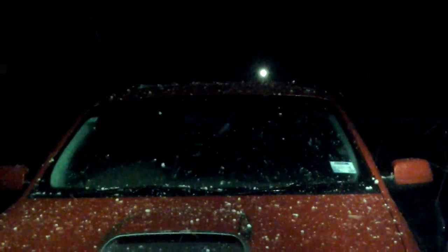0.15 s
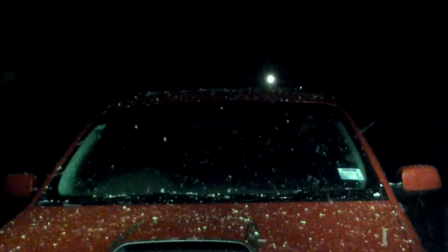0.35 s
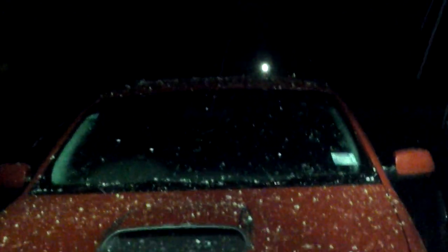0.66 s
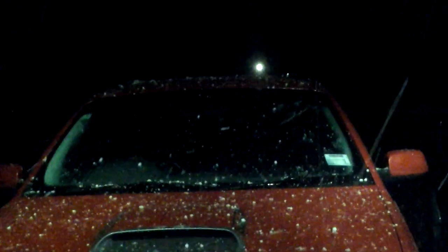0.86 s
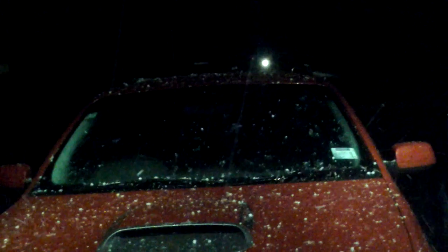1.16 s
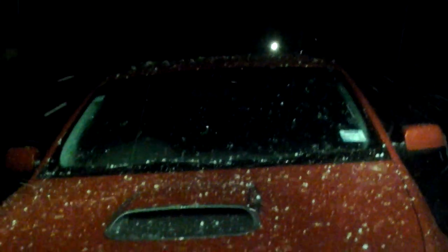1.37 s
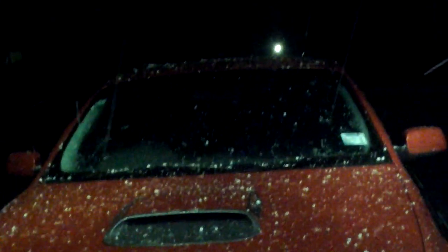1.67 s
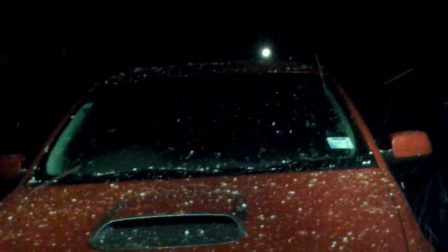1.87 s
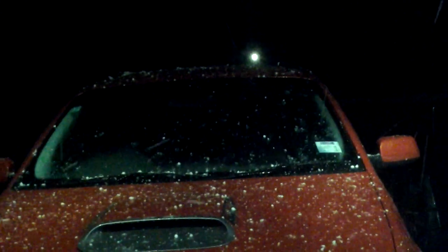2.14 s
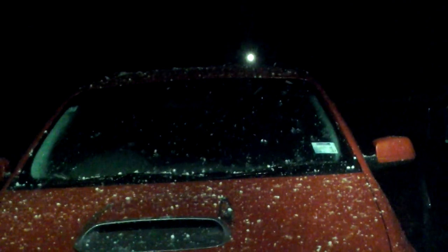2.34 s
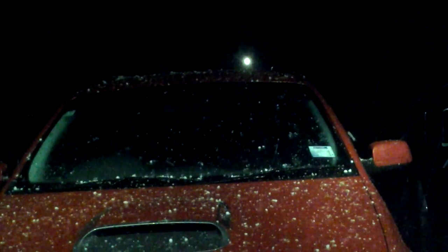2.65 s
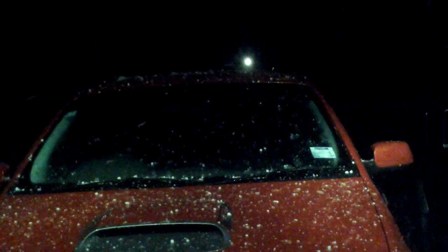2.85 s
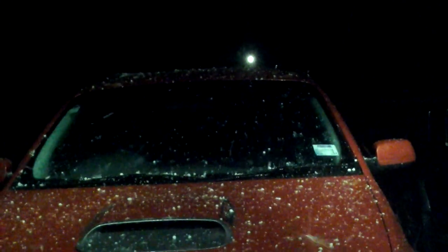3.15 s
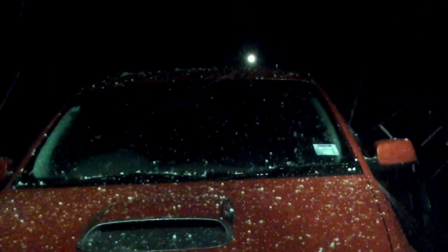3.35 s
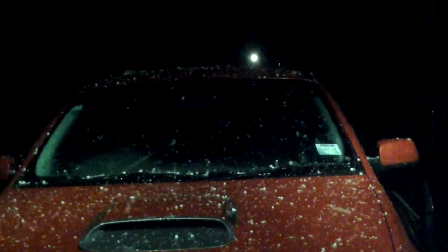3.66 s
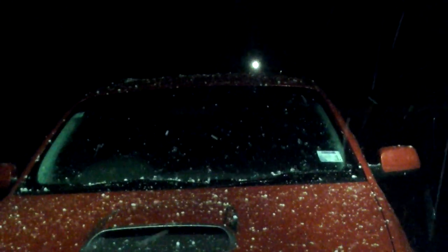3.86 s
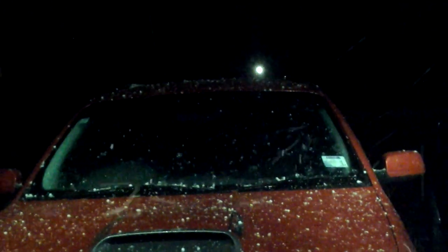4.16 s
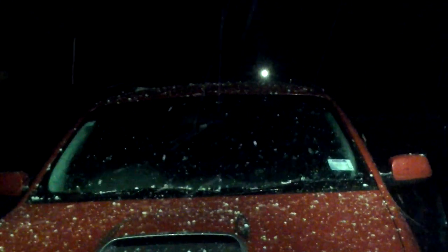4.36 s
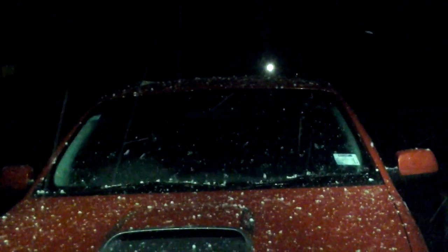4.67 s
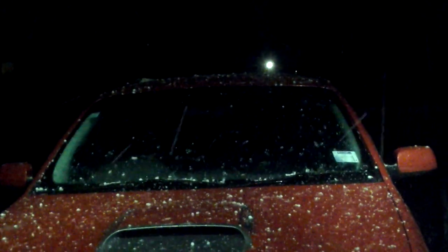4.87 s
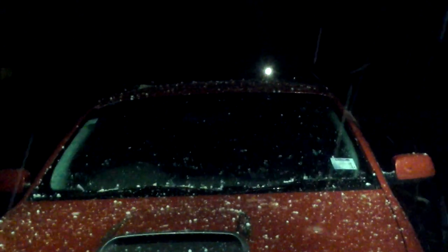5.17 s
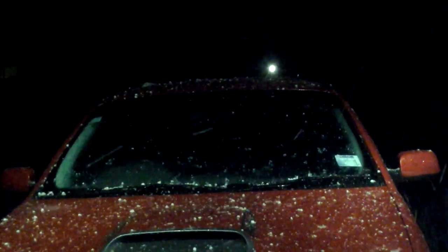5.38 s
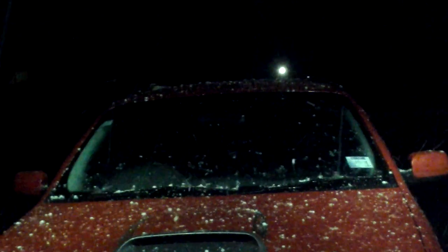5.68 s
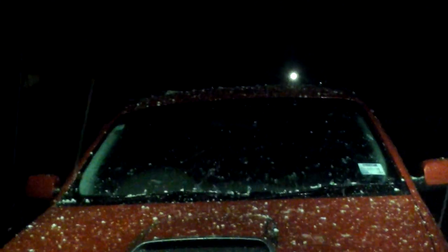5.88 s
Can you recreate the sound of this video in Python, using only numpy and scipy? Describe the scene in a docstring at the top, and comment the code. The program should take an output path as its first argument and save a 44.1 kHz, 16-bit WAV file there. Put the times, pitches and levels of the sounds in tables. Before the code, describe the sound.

Close and outdoors, heavy hail batters a parked car without pause. Thousands of small blows merge into a metallic drumming from roof and bonnet, while stones tick and rap on the windscreen. Heavier ones knock several times a second with short booms, big ones clack sharply, and ice chips skitter and hiss. The sound is loud, squashed and slightly overloaded.

```python
"""Heavy hail drums on the roof and bonnet of a parked car: thousands of blows a second ring dense panel modes.
Heavier stones knock and boom on the metal, and overload the recorder with a low thump; loud moments crackle.
Stones tick and rap on the windscreen, a stiffer plate; big ones clack with two brief modes and scatter pieces.
Breaking ice skitters and hisses.
A gain control steadies the loud clatter, its highest peaks flatten, and the top of the band is cut off."""
import sys
import numpy as np
from scipy import signal
from scipy.fft import rfft, irfft, next_fast_len
from scipy.io import wavfile
from scipy.ndimage import map_coordinates

SR = 44100
rng = np.random.default_rng(int(sys.argv[2]) if len(sys.argv) > 2 else 0)


def log_audio(samples):
    """Write samples as a 16-bit WAV file to the path given in sys.argv[1]."""
    # one column per channel
    frames = np.atleast_2d(samples).T
    # limit to full scale, then quantise
    limited = np.clip(frames, -1, 1)
    pcm = np.round(limited * 32767).astype(np.int16)
    wavfile.write(sys.argv[1], SR, pcm)


N = 265299

# Radiation spectrum of skittering ice chips: frequency_hz, relative_level_db (per Hz)
CHIP_SPECTRUM = [(2500, -40), (4500, 11), (5600, 6), (7000, 3), (8700, 3.5), (10000, -2), (11800, -3.5),
                 (12800, -40), (14500, -42)]
# Heavy stones on the sheet metal and the overload thump that comes with each, levels relative:
# start_s, roof_boom_db, bonnet_boom_db, knock_db, knock_hz, overload_thump_db
HEAVY_STONES = [(0.074, -28, -19, 7.5, 885, -55), (0.176, -24, -18, -3, 1080, -42),
                (0.499, -15, -27, -9, 587, -55), (0.545, -14, -18, 6, 544, -41),
                (0.754, -26, -13, 3, 920, -32), (0.812, -21, -18, 0, 960, -32),
                (1.046, -8, -7, 2, 990, -45), (1.062, -26, -16, 3, 1410, -33),
                (1.169, -10, -12, 4, 445, -39), (1.312, -10, -7.5, 5, 1010, -39),
                (1.422, -8, -8, 4, 1080, -30), (1.616, -23, -20, 2, 744, -38),
                (1.759, -20, -27, -3, 970, -33), (1.957, -18, -11, 0, 1280, -47),
                (2.05, -28, -12, 3, 1130, -55), (2.146, -7, -19, 7, 563, -32),
                (2.265, -8, -18, -3, 660, -42), (2.604, -22, -28, 1, 600, -36),
                (2.756, -11, -10, 6, 820, -34), (2.852, -16, -18, 1, 860, -35),
                (2.983, -24, -13, -9, 680, -55), (3.019, -7, -20, 9, 660, -30),
                (3.283, -16, -14, -1, 900, -44), (3.387, -26, -13, 4, 975, -43),
                (3.496, -24, -24, 6, 714, -37), (3.595, -28, -11, -6, 1190, -55),
                (3.633, -17, -26, 3, 564, -36), (3.754, -22, -20, 4.5, 840, -40),
                (3.851, -12, -17, 7, 750, -57), (4.022, -16, -27, -4, 1060, -36),
                (4.072, -23, -22, 1, 800, -35), (4.135, -26, -11, 0, 1220, -39),
                (4.201, -10, -8.5, 6, 726, -45), (4.241, -19, -11, 6, 710, -40),
                (4.372, -12, -23, 5, 650, -29), (4.456, -24, -6, -1, 1150, -55),
                (4.547, -24, -26, 2, 880, -40), (4.652, -11, -9, 7, 670, -34),
                (4.775, -8, -19, 5, 1000, -35), (4.876, -25, -17, -2, 1080, -40),
                (5.242, -13, -26, 3, 566, -40), (5.312, -18, -13, -2, 1030, -55),
                (5.393, -20, -14, 7, 517, -35), (5.513, -14, -11, 6, 580, -36),
                (5.672, -13, -19, 4, 744, -35), (5.728, -12, -15, 1, 900, -40),
                (5.827, -18, -15, -3, 624, -40), (5.965, -24, -7, 7, 1000, -38)]


def amp(db):
    """Level to amplitude: 20 dB is a factor of ten."""
    return 10 ** (np.asarray(db) / 20)


def unit(x):
    """Normalisation to an rms of 1."""
    return x / np.sqrt(np.mean(x ** 2) + 1e-20)


def along(points, hz):
    """Interpolation of a spectrum on a logarithmic frequency axis."""
    f, v = np.transpose(points)
    return np.interp(np.log(hz + 1), np.log(f), v)


def curves(rows):
    """Linear interpolation in time: one value per sample for each column after the time."""
    s, *columns = np.transpose(rows)
    return [np.interp(np.arange(N) / SR, s, column) for column in columns]


def wobble(rate):
    """Band-limited random fluctuation: a smooth curve through rate random knots a second."""
    knots = rng.standard_normal(int(N * rate / SR) + 4)
    return map_coordinates(knots, [np.arange(N) * rate / SR])


def swells(times, levels_db, rise, t60):
    """Exponential build-up and decay: envelopes with rise constant rise and 60 dB decay time t60 (s)."""
    t = np.arange(SR // 2) / SR
    out = np.zeros(N + SR)
    for s, db in zip(times, levels_db):
        out[round(s * SR):][:len(t)] += amp(db - 60 * t / t60) * (1 - np.exp(-t / rise))
    return out[:N]


def coloured(x, spectrum, size=4096):
    """Minimum-phase filtering: folding the cepstrum gives the causal response with this spectrum."""
    log_gain = np.log(amp(along(spectrum, np.fft.rfftfreq(size, 1 / SR))))
    cepstrum = irfft(log_gain)
    cepstrum[1:size // 2] *= 2
    cepstrum[size // 2 + 1:] = 0
    response = irfft(np.exp(rfft(cepstrum)))
    return signal.fftconvolve(x, response)[:len(x)]


def click(hz, t, cycles):
    """Damped mode: builds within its first cycle, decays by 1/e in cycles periods; silent before t = 0."""
    turns = hz * np.maximum(t, 0)
    build = 1 - np.exp(-5 * turns)
    return np.sin(2 * np.pi * turns) * build * np.exp(-turns / cycles)


def superposed(when, sounds):
    """Superposition: adds one row of sounds at each start, given as a fraction of the whole; rms 1."""
    at = (when * N).astype(int)[:, None] + np.arange(sounds.shape[1])
    return unit(np.bincount(at.ravel(), sounds.ravel(), N)[:N])


def pelting(spectrum, per_second, spread_db, t60, contact, size=4096):
    """Random impacts on a surface of high modal density: contact pulses plus a diffuse ring; rms 1."""
    length = N + size
    lands = rng.random(length) < per_second / SR
    blows = lands * amp(spread_db * np.clip(rng.standard_normal(length), -2, 2))
    # every spot rings with its own thicket of modes, so the rings add in energy
    dying = amp(-60 * np.arange(size) / SR / t60) ** 2
    energy = np.abs(signal.fftconvolve(blows ** 2, dying / dying.sum())[:length])
    ring = np.sqrt(energy) * rng.standard_normal(length)
    contacts = contact * blows * rng.choice([-1, 1], length)
    return unit(coloured(contacts + ring, spectrum)[size:])


def pings(per_second, centre_hz, octaves, cycles, spread_db, size=512):
    """Damped modes of small stones: each clicks for a few cycles at a pitch of its own; rms 1."""
    t = np.arange(size) / SR
    when, pitch, weight = rng.random((int(per_second * N / SR), 3)).T
    hz = centre_hz * 2 ** (octaves * (2 * pitch[:, None] - 1))
    # a random weighting of levels; gain also falls as pitch rises
    gain = amp(spread_db * weight[:, None] ** 2) * centre_hz / hz
    return superposed(when, gain * click(hz, t, cycles))


def crackles(pitch_hz=11500, octaves=0.35, cycles=7, spread_s=0.007, count=4, size=1024):
    """Overload crackle: a few tiny, very bright damped clicks within a moment."""
    # Overload crackles: start_s, relative_level_db
    crackle_events = [(0.375, -37), (1.05, -34), (1.85, -35), (2.148, -33), (2.603, -31), (3.634, -36),
                      (3.66, -32), (3.819, -31), (4.028, -32), (4.243, -32), (4.373, -33), (4.547, -32),
                      (4.82, -33), (5.84, -33), (5.969, -31)]
    t = np.arange(size) / SR
    out = np.zeros(N + size)
    for s, db in crackle_events:
        delays, pitches = rng.random((2, count, 1))
        hz = pitch_hz * 2 ** (octaves * (2 * pitches - 1))
        ticks = click(hz, t - spread_s * delays, cycles)
        out[round(s * SR):][:size] += amp(db) * ticks.sum(0)
    return out[:N]


def overload_thumps(thump_hz=58, t60=0.032, thump_gain_db=6.5, size=4096):
    """Overload thump: a soft, low, damped bump as a loud blow clips the recorder."""
    t = np.arange(size) / SR
    out = np.zeros(N + size)
    for s, *_, db in HEAVY_STONES:
        envelope = amp(db + thump_gain_db - 60 * t / t60)
        out[round(s * SR):][:size] += envelope * np.sin(2 * np.pi * thump_hz * t)
    return out[:N]


def sprays(rise=0.0084, chips_t60=0.4, fine_t60=0.27):
    """Fragmentation: a stone bursts into skittering chips and fine ice that hisses very high over the paint."""
    # Bursting stones, levels relative: start_s, chips_db, fine_hiss_db
    bursts = [(0.03, -36, -48), (0.28, -49, -56), (0.485, -34, -50), (0.857, -36, -32), (1.15, -30, -46),
              (1.228, -36, -32), (1.49, -41, -52), (1.685, -34, -35), (1.90, -33.5, -54), (2.15, -35, -53),
              (2.245, -47, -58), (2.40, -48, -60), (2.56, -38, -48), (3.275, -36, -39), (4.03, -47, -50),
              (4.425, -31.5, -34), (4.745, -38, -50), (5.02, -35, -37), (5.55, -47, -52)]
    # Radiation spectrum of the finest ice: frequency_hz, relative_level_db (per Hz)
    fine_spectrum = [(6000, -30), (10000, -10), (11500, 7), (12500, 12), (14300, -5)]
    times, chips_db, fine_db = np.transpose(bursts)
    skitter = pelting(CHIP_SPECTRUM, per_second=900, spread_db=-1, t60=0.047, contact=0.3)
    hiss = pelting(fine_spectrum, per_second=650, spread_db=6.0, t60=0.013, contact=0.5)
    chips = swells(times, chips_db, rise, chips_t60) * skitter
    fine = swells(times, fine_db, rise, fine_t60) * hiss
    return chips + fine


def ice(glass_db, chips_db):
    """Impact on a stiff plate: stones tick on the windscreen, ping off one another and shed skittering chips."""
    # Radiation spectrum of the windscreen: frequency_hz, relative_level_db (per Hz)
    glass_spectrum = [(900, -40), (1800, 3), (2400, -0.5), (3000, -2), (3300, -5), (3750, 0.5), (4400, -8),
                      (4850, -11), (5500, -18.5), (8000, -21.5), (14000, -72)]
    # Radiation spectrum of the nearest dry raps: frequency_hz, relative_level_db (per Hz)
    rap_spectrum = [(120, -45), (500, -17), (1500, 4.5), (3000, -8), (5000, -19), (8000, -28), (11000, -40),
                    (14000, -67)]
    windscreen = pelting(glass_spectrum, per_second=560, spread_db=1.2, t60=0.04, contact=0.12)
    ticks = amp(glass_db - 2.5) * windscreen
    # the nearest stones stand out as separate dry raps
    raps = amp(glass_db - 3) * pelting(rap_spectrum, per_second=130, spread_db=1.2, t60=0.02, contact=0.2)
    small_stones = pings(per_second=520, centre_hz=3400, octaves=0.65, cycles=5.5, spread_db=10)
    clicks = amp(glass_db - 5) * small_stones
    skitter = pelting(CHIP_SPECTRUM, per_second=1700, spread_db=2, t60=0.05, contact=0.25)
    splinters = pings(per_second=170, centre_hz=7200, octaves=0.55, cycles=9, spread_db=8)
    chips = amp(chips_db - 0.1) * (skitter + amp(-8) * splinters)
    return ticks + raps + clicks + chips


def breaking_ice():
    """Impact strength governs fragmentation: a harder fall raises the chips more than the blows on the glass."""
    # Strength of the fall on the glass; only its departure from the mean counts: time_s, level_db
    glass_fall = [(0.0, -40.5), (0.13, -44), (0.3, -43), (0.53, -43), (0.87, -37.5), (1.02, -42),
                  (1.81, -41), (3.02, -42), (3.25, -40), (3.5, -42), (4.0, -41.5), (4.24, -40.5),
                  (4.86, -39), (5.8, -39.5), (6.02, -41)]
    fall_db, = curves(glass_fall)
    # quick random flurries, 22 knots a second
    shatter_db = fall_db - fall_db.mean() + 1.45 * wobble(22)
    return ice(glass_db=-28.5 + 0.85 * shatter_db, chips_db=-41.5 + 1.3 * shatter_db)


def big_stones(clack_cycles=2.8, clack_db=-1, upper_ratio=1.36, upper_db=-7,
               octaves=0.63, piece_cycles=2.6, count=22, size=4096):
    """Two-mode impact and fracture: a big stone clacks on the glass; its pieces land in a tight cluster."""
    # Big stones, levels relative; flight_s scales the random delays of the pieces:
    # start_s, clack_db, clack_hz, pieces_db, flight_s
    stones = [(0.296, -12, 3230, -22.5, 0.007), (0.545, -20, 2750, -23, 0.008),
              (0.723, -20, 2960, -28, 0.005), (0.741, -19, 3280, -31, 0.005), (0.81, -20, 4200, -29, 0.004),
              (0.864, -22, 6000, -28, 0.006), (0.991, -16, 3870, -31, 0.006),
              (1.047, -21, 3200, -30, 0.008), (1.163, -28, 6500, -33.5, 0.009),
              (1.234, -20, 7000, -38, 0.003), (1.318, -17, 2450, -25, 0.007),
              (1.366, -27, 5320, -36, 0.004), (1.528, -26, 3620, -34, 0.004),
              (1.562, -13, 2930, -32, 0.006), (1.825, -14, 5500, -24, 0.0015),
              (1.835, -15, 3460, -30, 0.006), (1.885, -23, 3500, -29, 0.006),
              (1.967, -17, 6500, -36, 0.002), (2.164, -24, 5200, -32, 0.007),
              (2.252, -12, 2710, -26, 0.007), (2.411, -20, 6200, -29.5, 0.003),
              (2.76, -25, 3320, -32, 0.006), (2.979, -17, 2820, -34, 0.005), (3.124, -18, 3750, -27, 0.005),
              (3.257, -18, 2910, -33, 0.007), (3.384, -9, 2570, -20, 0.008), (3.416, -21, 2930, -21, 0.007),
              (3.819, -29, 8500, -38, 0.002), (3.83, -15, 2510, -28, 0.005), (4.155, -19, 2360, -28, 0.006),
              (4.179, -19, 2780, -26, 0.005), (4.216, -18, 2930, -25, 0.005),
              (4.243, -27, 5400, -33, 0.002), (4.372, -25, 5200, -30, 0.002),
              (4.487, -21, 2800, -21, 0.014), (4.529, -11, 2510, -24, 0.006),
              (4.776, -22, 3680, -36, 0.004), (4.821, -15, 2820, -20.5, 0.007),
              (4.858, -19, 3100, -22, 0.011), (4.905, -21, 3500, -28, 0.006),
              (4.972, -27, 7490, -41, 0.004), (5.024, -11, 2680, -26, 0.006),
              (5.235, -18, 3020, -35, 0.006), (5.314, -18, 2800, -28, 0.007),
              (5.435, -27, 7710, -38, 0.005), (5.478, -15, 3240, -28, 0.007),
              (5.568, -25, 3770, -35, 0.004), (5.94, -25, 7600, -38, 0.004), (5.974, -12, 2850, -37, 0.005)]
    t = np.arange(size) / SR
    out = np.zeros(N + size)
    for s, db, hz, pieces_db, flight_s in stones:
        upper = click(upper_ratio * hz, t, clack_cycles)
        clack = click(hz, t, clack_cycles) + amp(upper_db) * upper
        delays = flight_s * rng.gamma(1.5, 0.8, (count, 1))
        # each piece has a pitch near the stone's, the higher the fainter
        ratios = 2 ** (octaves * rng.uniform(-1.17, 1, (count, 1)))
        pieces = (click(hz * ratios, t - delays, piece_cycles) / ratios).sum(0)
        # level the cluster by its energy over twice flight_s
        pieces /= np.sqrt(np.sum(pieces ** 2) / (2 * flight_s * SR))
        out[round(s * SR):][:size] += amp(db + clack_db) * clack + amp(pieces_db) * pieces
    return out[:N]


def heavy_knocks(t60=0.025, knock_db=-5.5, upper_ratio=1.5, upper_db=-7, size=4096):
    """Local modal excitation: a heavy stone's first blow rings two short modes of the spot it hits."""
    t = np.arange(size) / SR
    out = np.zeros(N + size)
    for s, _, _, db, hz, _ in HEAVY_STONES:
        cycles = hz * t60 / np.log(1000)  # 60 dB is a factor of 1000
        upper_hz = hz * upper_ratio * 2 ** rng.normal(0, 0.13)
        knock = click(hz, t, cycles) + amp(upper_db) * click(upper_hz, t, cycles)
        out[round(s * SR):][:size] += amp(db + knock_db) * knock
    return out[:N]


def knocks(per_second, centre_hz, octaves, t60, spread_db, size=2048, count=3):
    """Local modal excitation: middling stones each ring a few short modes of the spot they hit; rms 1."""
    t = np.arange(size) / SR
    draws = rng.random((int(per_second * N / SR), count + 2))
    when, weight, spots = draws[:, 0], draws[:, 1:2], draws[:, 2:]
    modes_hz = centre_hz * 2 ** (octaves * (2 * spots - 1))
    modes = sum(np.sin(2 * np.pi * hz[:, None] * t) for hz in modes_hz.T)
    rings = modes * amp(-60 * t / t60)
    gain = amp(spread_db * weight) * rng.choice([-1, 1], weight.shape)
    return superposed(when, gain * rings)


def sheet_metal():
    """Plate radiation: the broad roof drums low, the stiffer bonnet higher; heavy stones make both boom."""
    # Radiation spectra of the two panels: frequency_hz, relative_level_db (per Hz)
    roof_spectrum = [(60, -71.5), (120, -38), (160, -24.5), (200, -21.5), (260, -11), (330, -5.5), (420, 0),
                     (510, 0.5), (660, 1.5), (850, -10.5), (1300, -17.5), (3000, -66.5)]
    bonnet_spectrum = [(100, -63), (200, -47.5), (500, -18), (750, -1), (970, 1), (1220, 0), (1400, -4.5),
                       (1600, -5.5), (1950, -11), (2300, -19), (3200, -25), (6000, -63.5)]
    # Strength of the fall on the bonnet, the nearest panel: time_s, relative_level_db
    bonnet_fall = [(0.0, -12.5), (0.45, -14), (0.72, -11), (1.2, -11.5), (1.75, -12), (2.0, -10.5),
                   (2.2, -12), (2.45, -11), (2.62, -13.5), (3.15, -12), (3.42, -12.5), (3.88, -13),
                   (4.13, -11.5), (4.32, -13), (4.48, -11.5), (4.9, -11.5), (5.85, -12.5), (6.02, -10.5)]
    bonnet_db, = curves(bonnet_fall)
    times, roof_boom_db, bonnet_boom_db, *_ = np.transpose(HEAVY_STONES)
    roof_boom = swells(times, roof_boom_db, rise=0.0016, t60=0.19)
    bonnet_boom = swells(times, bonnet_boom_db, rise=0.0016, t60=0.19)
    # steady drumming and booms add in power
    roof_gain = np.hypot(amp(-13.5), roof_boom)
    bonnet_gain = np.hypot(amp(bonnet_db + 0.57), bonnet_boom)
    roof = roof_gain * pelting(roof_spectrum, per_second=2400, spread_db=-0.5, t60=0.13, contact=0.39)
    bonnet = bonnet_gain * pelting(bonnet_spectrum, per_second=800, spread_db=0, t60=0.26, contact=0.46)
    middling = knocks(per_second=190, centre_hz=970, octaves=0.8, t60=0.034, spread_db=5)
    blows = amp(bonnet_db - 5.5) * middling + heavy_knocks()
    # the small panels radiate little bass
    high_pass = signal.butter(4, 300, "high", fs=SR, output="sos")
    radiated = signal.sosfilt(high_pass, blows)
    return roof + bonnet + radiated


def scene():
    """Linear superposition of the struck parts of the car, the breaking ice and the overload sounds."""
    overload = crackles() + overload_thumps()
    return (overload + sprays() + breaking_ice() + big_stones() + sheet_metal())[None]


def gain_control(x, aim_db=-9, memory_s=0.081, slope=0.82):
    """Feed-forward compression: the gain sinks after loud blows and creeps up in the lulls."""
    keep = np.exp(-1 / (memory_s * SR))
    # running mean power relative to the aim, starting at the aim
    excess = 1 + signal.lfilter([1 - keep], [1, -keep], (x / amp(aim_db)) ** 2 - 1)
    # slope: dB of gain taken back per dB of excess
    return x * np.sqrt(np.abs(excess)) ** -slope


def record(dry):
    """Compression, saturation at full scale and band limiting, in that order."""
    # Band shaping after clipping: low bumps softened, top dulled: frequency_hz, gain_db
    band_shape = [(40, -5.5), (90, -4), (150, 0), (11800, 0), (12600, -10), (13300, -6), (14600, -9)]
    hardness, top_hz = 18, 14600
    held = gain_control(dry)
    clipped = held / (1 + np.abs(held) ** hardness) ** (1 / hardness)
    m = next_fast_len(N + SR // 2)
    hz = np.fft.rfftfreq(m, 1 / SR)
    gain = amp(along(band_shape, hz)) * (hz < top_hz)
    return irfft(rfft(clipped, m) * gain, m)[..., :N]


dry = scene()
out = record(dry)
log_audio(out)
```